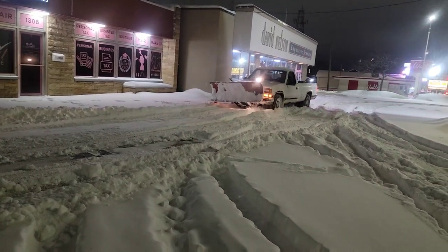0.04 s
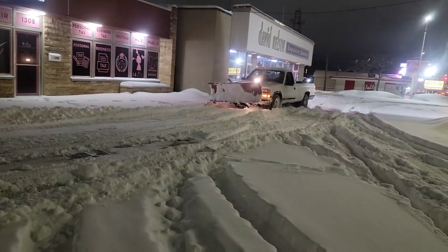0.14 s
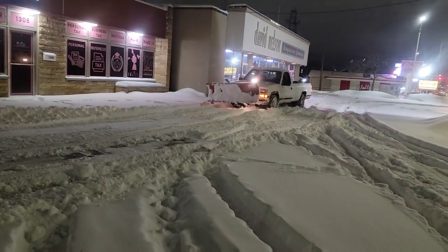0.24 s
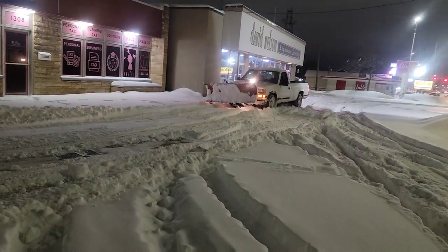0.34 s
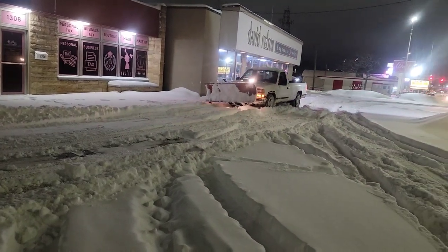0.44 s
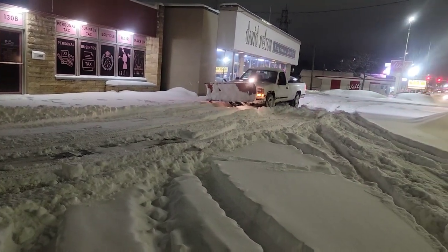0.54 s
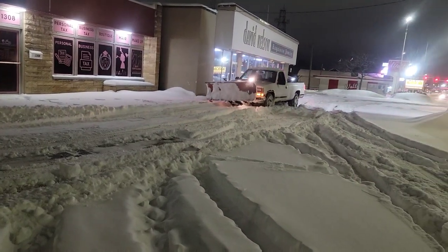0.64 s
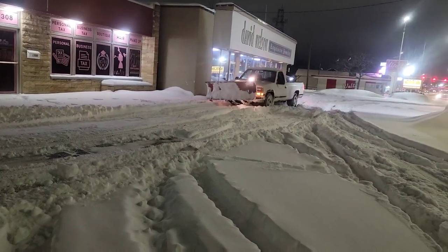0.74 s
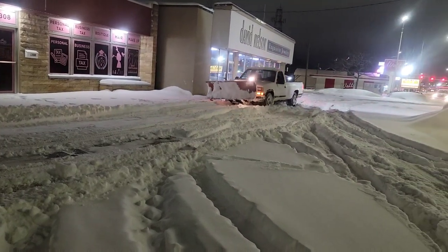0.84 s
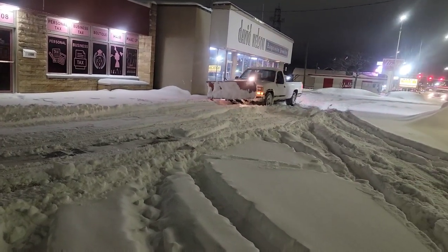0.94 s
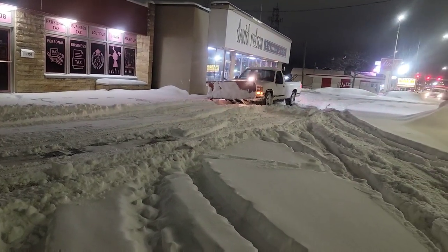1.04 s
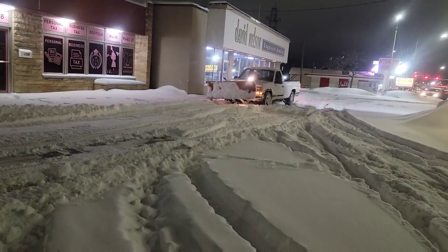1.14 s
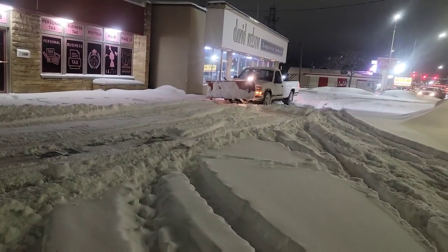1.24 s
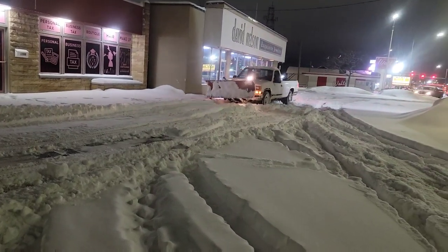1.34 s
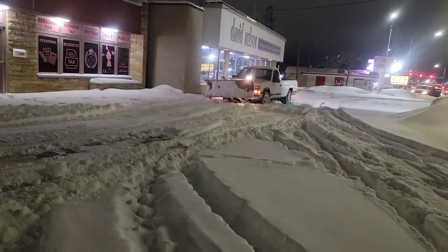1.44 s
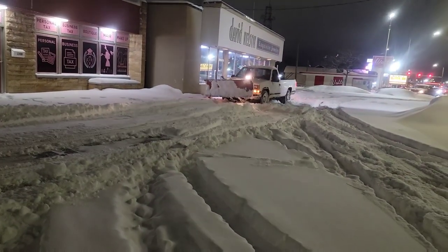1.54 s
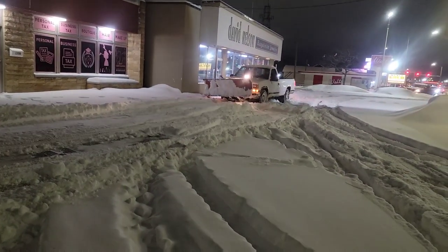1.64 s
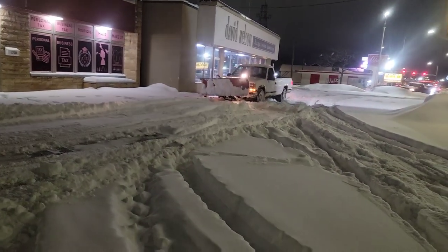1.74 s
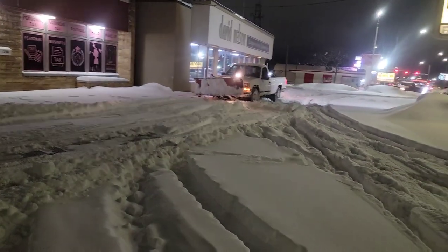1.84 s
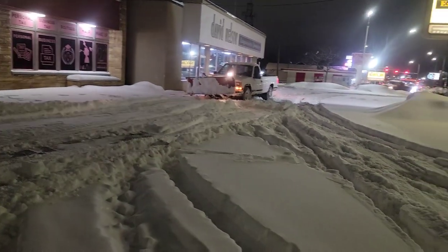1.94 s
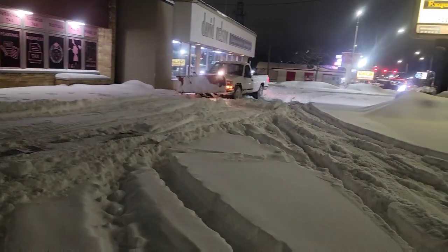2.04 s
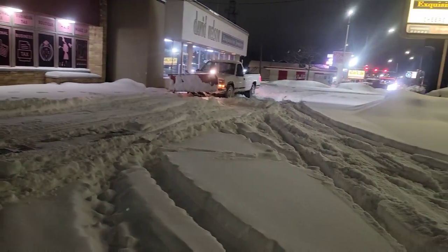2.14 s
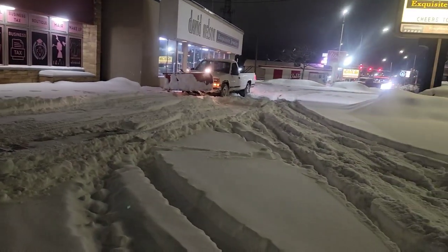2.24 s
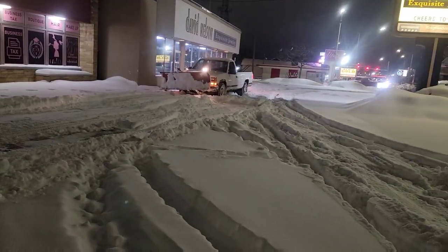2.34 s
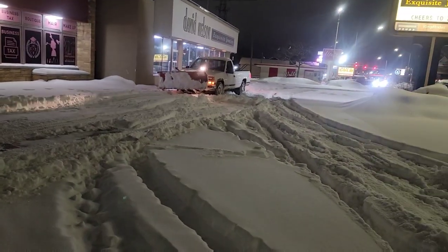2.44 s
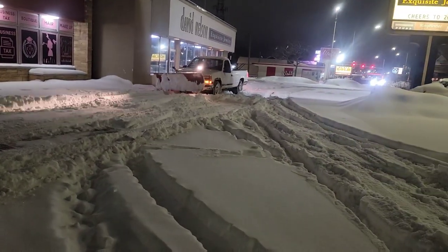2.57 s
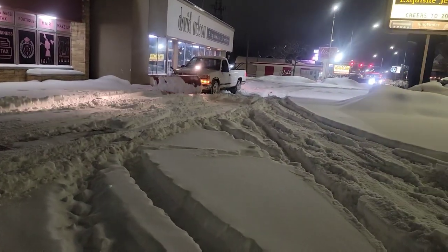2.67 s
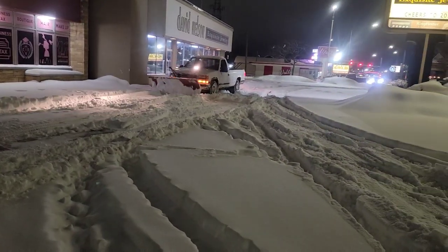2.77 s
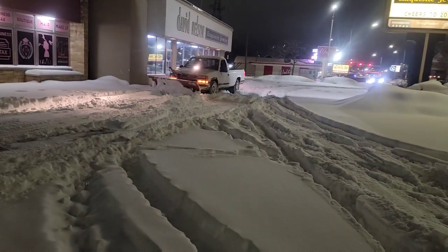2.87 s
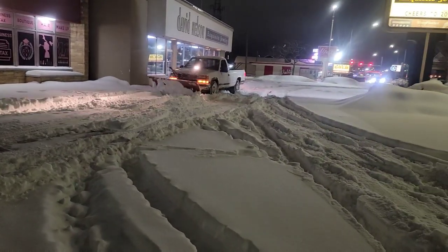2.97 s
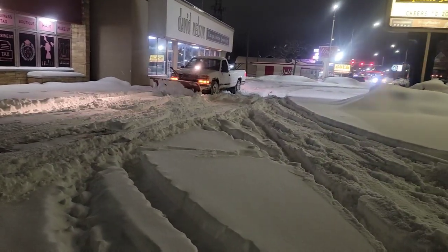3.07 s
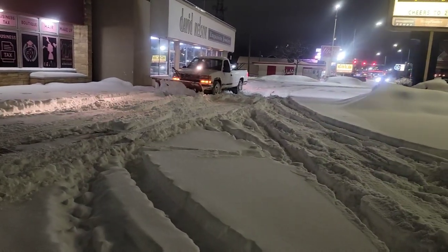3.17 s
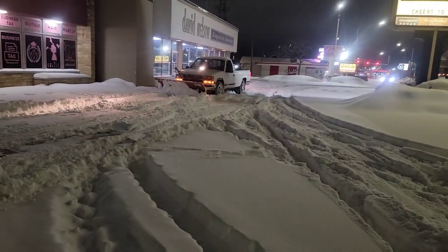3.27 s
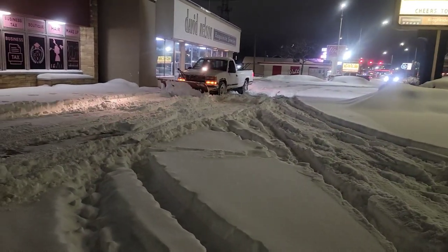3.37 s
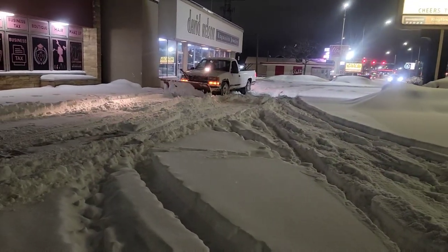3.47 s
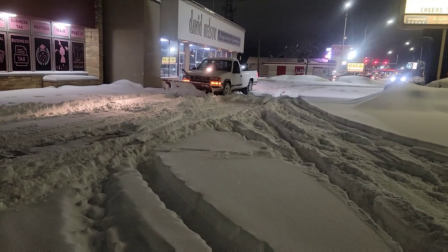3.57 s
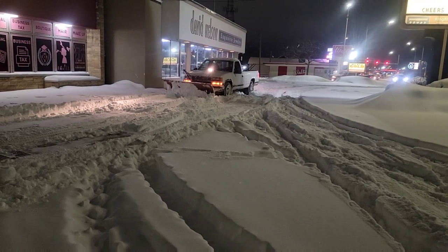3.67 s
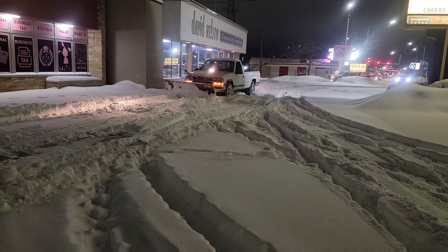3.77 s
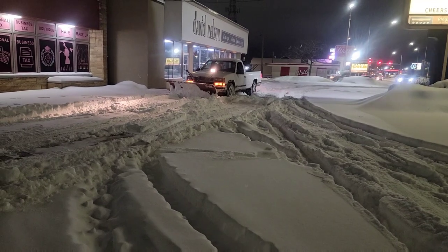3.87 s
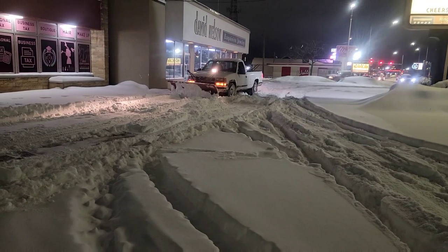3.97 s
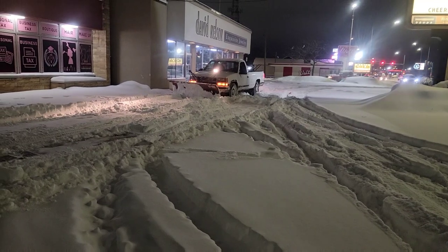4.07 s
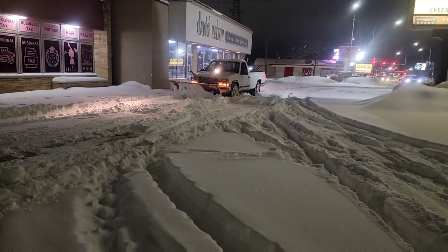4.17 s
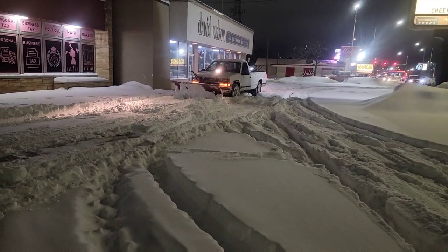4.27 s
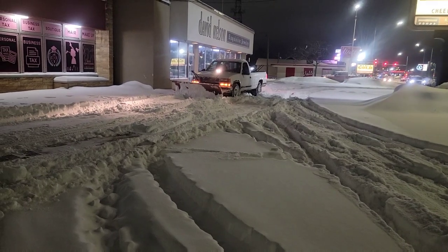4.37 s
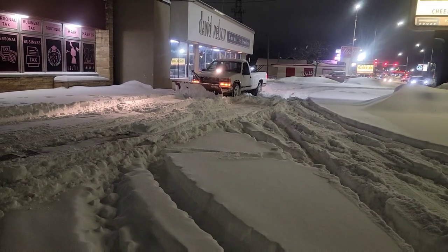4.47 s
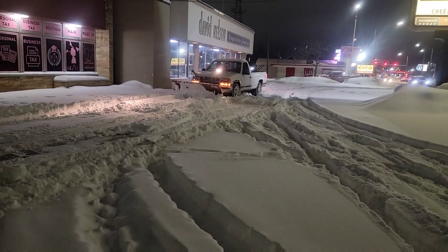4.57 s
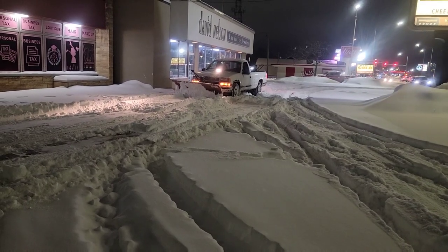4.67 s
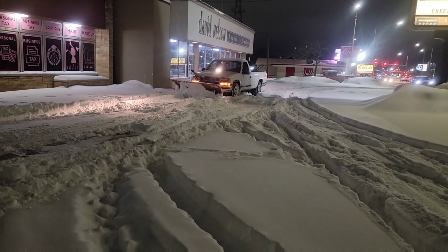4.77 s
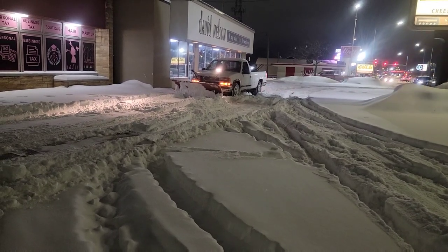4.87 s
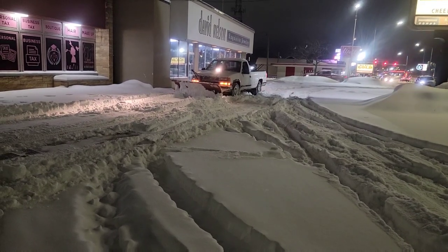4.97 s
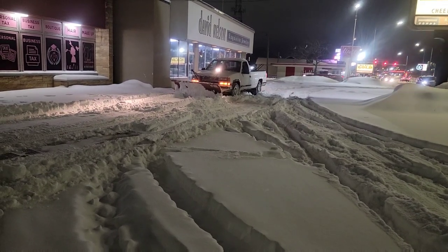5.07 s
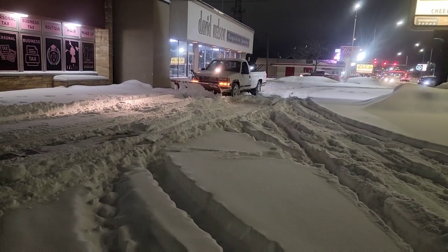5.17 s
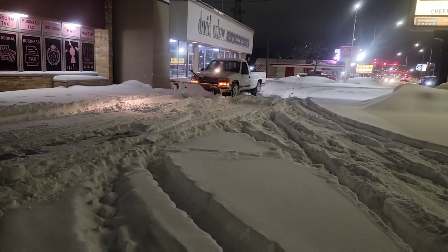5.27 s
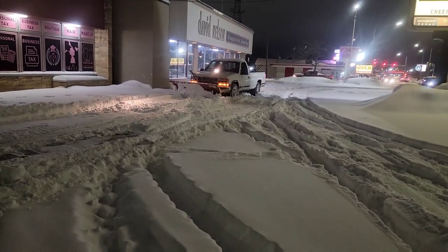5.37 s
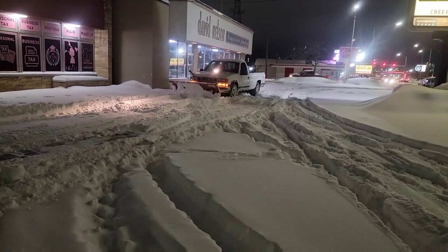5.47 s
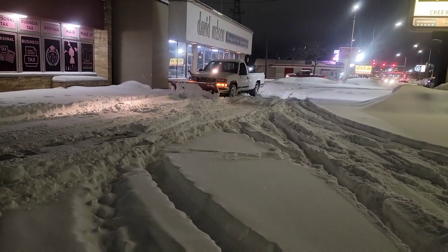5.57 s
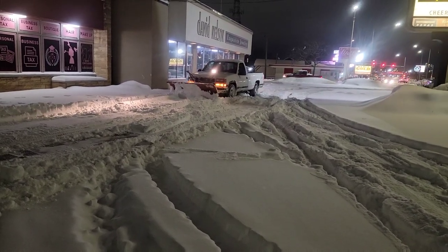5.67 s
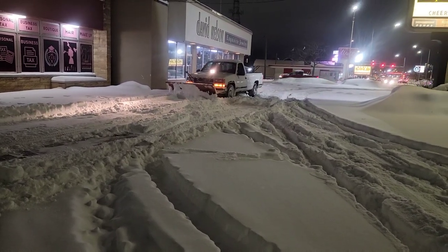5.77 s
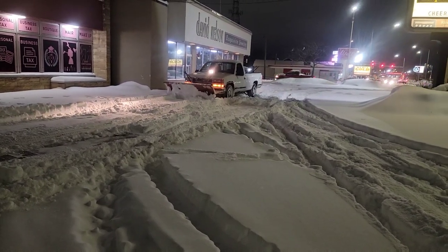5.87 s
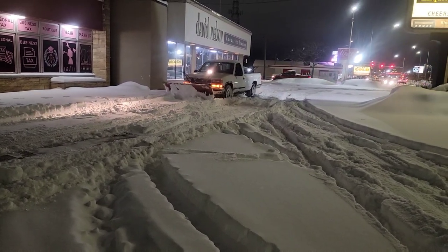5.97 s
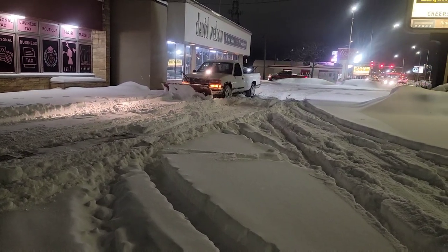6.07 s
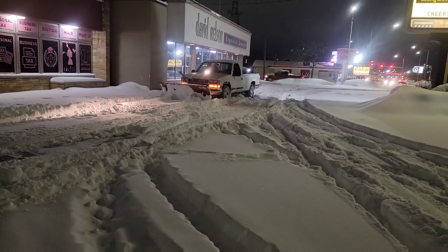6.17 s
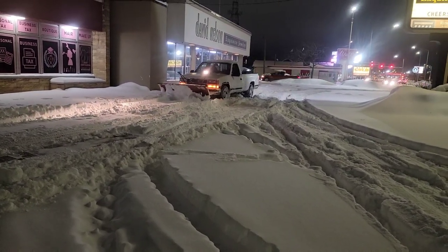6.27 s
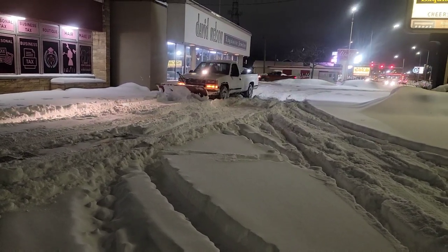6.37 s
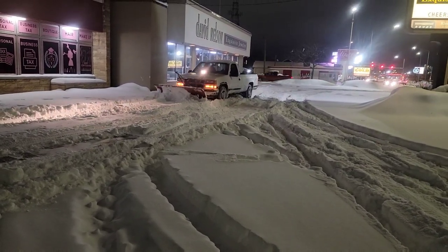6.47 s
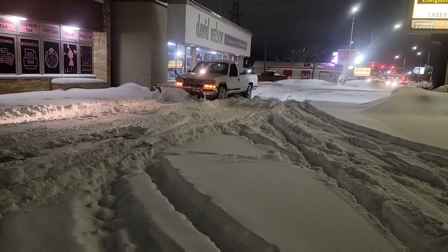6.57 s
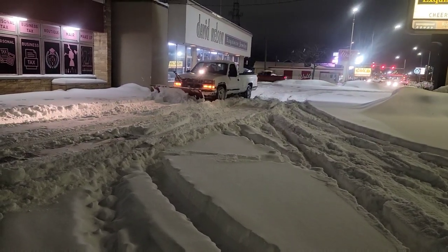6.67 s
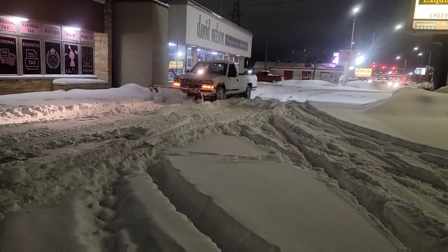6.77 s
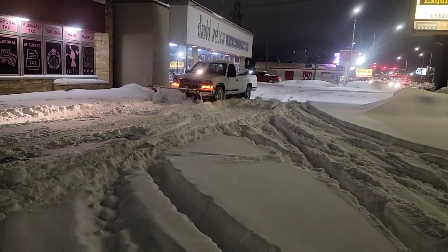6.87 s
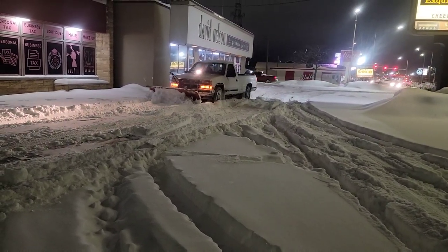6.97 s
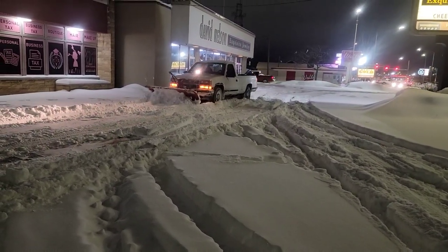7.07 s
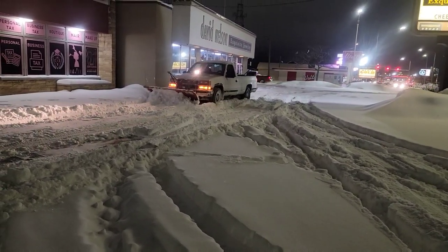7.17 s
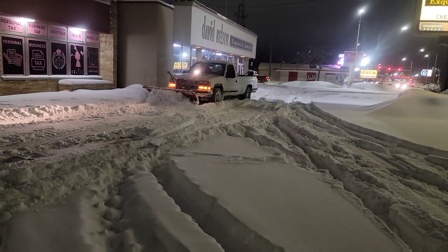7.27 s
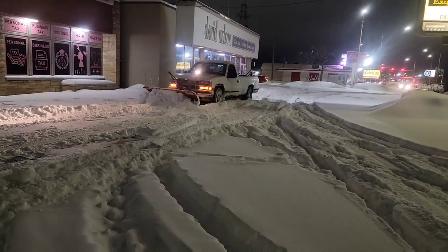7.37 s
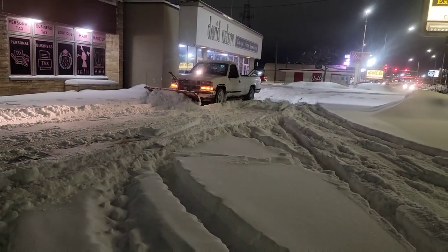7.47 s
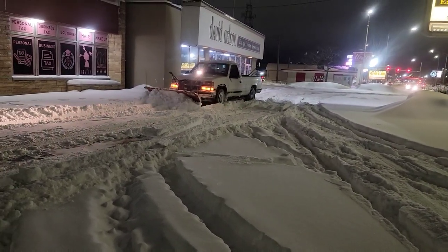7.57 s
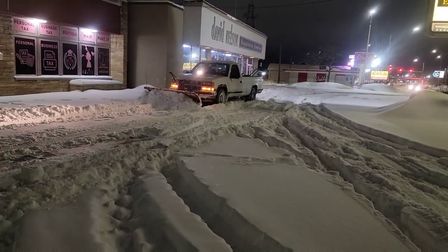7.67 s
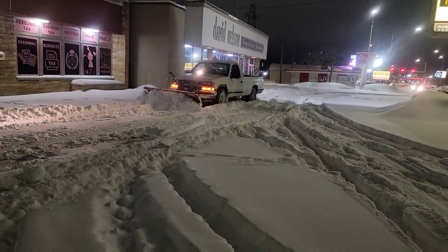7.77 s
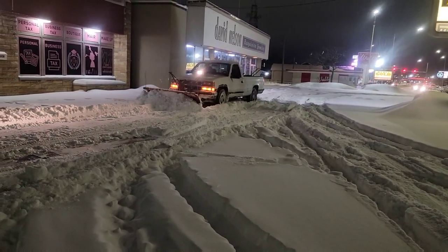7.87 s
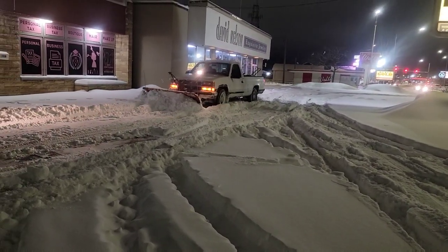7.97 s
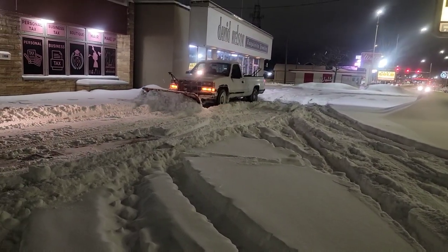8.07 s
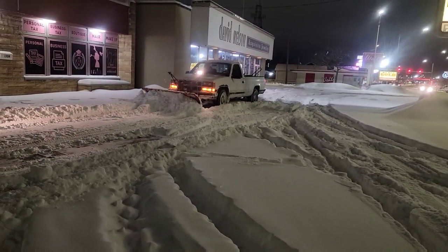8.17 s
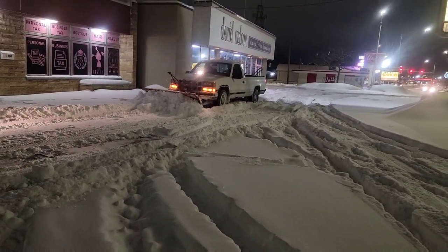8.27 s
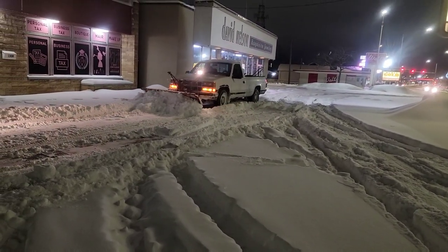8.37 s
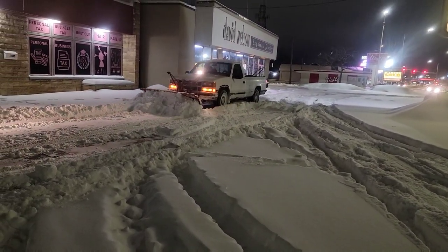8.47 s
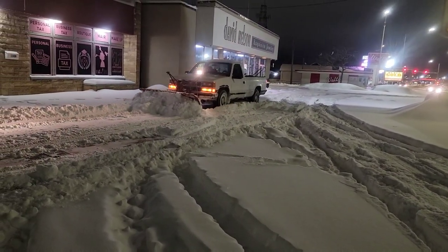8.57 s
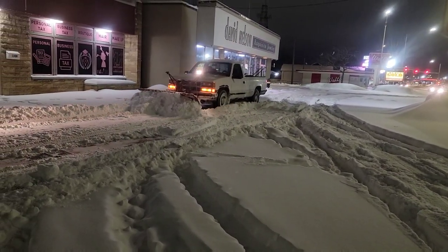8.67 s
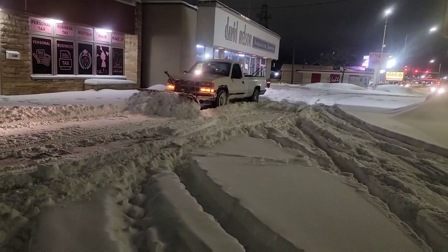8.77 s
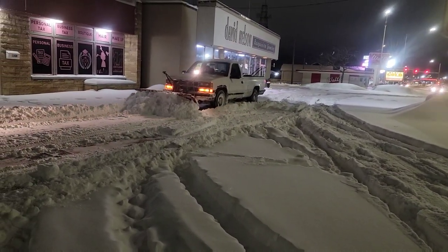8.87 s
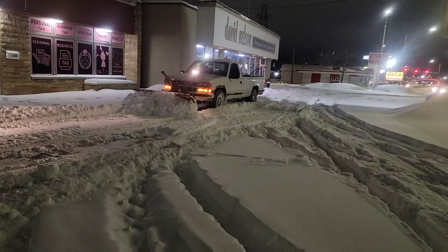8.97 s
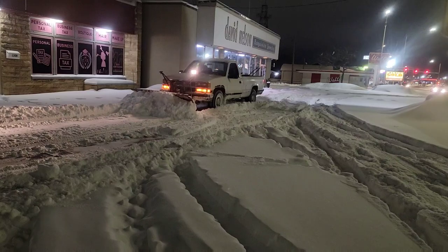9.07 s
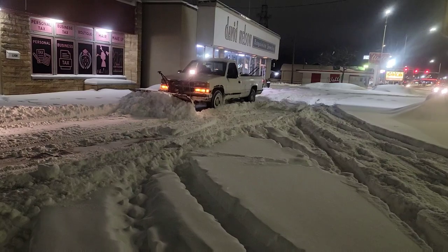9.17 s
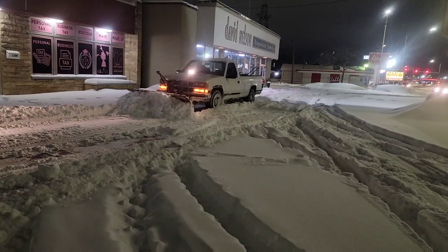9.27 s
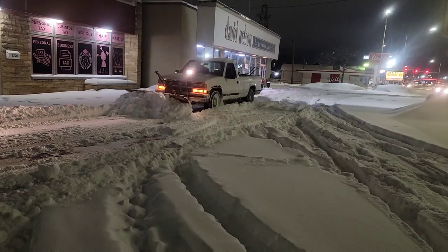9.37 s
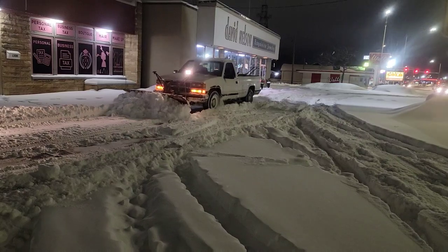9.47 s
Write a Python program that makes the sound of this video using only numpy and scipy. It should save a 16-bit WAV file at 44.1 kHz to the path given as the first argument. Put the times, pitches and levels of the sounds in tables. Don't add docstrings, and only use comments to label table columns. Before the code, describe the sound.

A large pickup gives a short rev, settles to a low lumpy idle, then climbs into loud booming revs as its plough crunches through snow. Cars hiss by on a slushy road, strongest midway. Hollow scrapes of steel and tyres come and go. Outdoors at night, hand-held stereo phone at a distance, faint town traffic behind.

```python
import sys
import numpy as np
from scipy import signal
from scipy.fft import rfft, irfft, next_fast_len
from scipy.io import wavfile
from scipy.ndimage import uniform_filter1d

SR = 44100
rng = np.random.default_rng(int(sys.argv[2]) if len(sys.argv) > 2 else 0)


def inscribe(sig):
    pcm = np.round(np.clip(np.atleast_2d(sig).T, -1, 1) * 32767)
    wavfile.write(sys.argv[1], SR, pcm.astype(np.int16))


def linear_from_db(decibels):
    return 10 ** (np.asarray(decibels, float) / 20)


N = 420273
T = np.arange(N) / SR
FRAME_T = np.arange(N // 256 + 5) * 256 / SR
BIN_HZ = np.fft.rfftfreq(1024, 1 / SR)[:, None]

# start in seconds, length in seconds,
# sag of the engine speed in Hz, cut of the exhaust in dB.
THROTTLE_LIFTS = [
    (5.72, 0.202, 0.393, 0),
    (7.641, .175, 3.1, -12.5),
    (8.435, .22, 3.2, -9),
    (8.984, 0.18, 0.452, 0),
]


def evened(x):
    return x / np.sqrt(np.mean(x ** 2) + 1e-20)


def read(points, hz):
    f, value = np.transpose(points)
    return np.interp(np.log(hz + 1), np.log(f + 1), value)


def curves(rows, t):
    s, *columns = np.transpose(rows)
    return [np.interp(t, s, c) for c in columns]


def drift(size):
    return evened(uniform_filter1d(uniform_filter1d(rng.standard_normal(N), size), size))


def noise(shape_db, level_db, same, lag, balance_db, patchy_db, flicker_db):
    a, b, c, d, patches = rng.standard_normal((len(FRAME_T), 513, 5), dtype=np.float32).T
    patches = evened(uniform_filter1d(uniform_filter1d(patches, 14, 0), 16, 1))
    flicker = evened(uniform_filter1d(rng.standard_normal(len(FRAME_T)), 8))
    same = np.clip(same, -1, 1)
    right = a + 1j * b
    delayed = right * np.exp(-2j * np.pi * BIN_HZ * lag / SR)
    left = same * delayed + np.sqrt(1 - same ** 2) * (c + 1j * d)
    shape = linear_from_db(shape_db) / np.sqrt(np.mean(linear_from_db(shape_db)[:, :1] ** 2))
    size = shape * linear_from_db(level_db + patchy_db * patches + flicker_db * flicker)
    z = np.array([left * linear_from_db(balance_db / 2), right / linear_from_db(balance_db / 2)]) * size
    return signal.istft(z / 20, nperseg=1024, noverlap=768)[1][:, :N]


def town():
    # frequency in Hz, level in dB.
    murmur = [(88, -46), (150, 1.5), (592, 2), (777, 3.5), (3510, -13), (4690, -14.5), (6780, -15),
              (8220, -44), (15300, -60)]
    # frequency in Hz, left-right likeness.
    murmur_same = [(150, 0.83), (300, 0.48), (600, 0), (1500, -1.05), (6000, -0.28)]
    return noise(read(murmur, BIN_HZ), -40, read(murmur_same, BIN_HZ), lag=1.0, balance_db=-3.2,
                 patchy_db=1.0, flicker_db=0.59)


def speed(t):
    # time in seconds, cycles a second in Hz.
    held_speed = [(0, 7.0), (.26, 11.0), (.42, 11.0), (.63, 8.6), (.85, 7.6), (1.2, 6.85), (1.8, 4.95),
                  (4.88, 4.72), (5.17, 5.6), (5.44, 7.4), (5.7, 7.9), (6.92, 8.5), (7.3, 16.7), (7.58, 19),
                  (8.05, 19.4), (8.42, 22), (8.9, 21), (9.53, 20.6)]
    sag = sum(sag_hz * np.maximum(1 - abs((t - s) / length - 1), 0) for s, length, sag_hz, _ in THROTTLE_LIFTS)
    return curves(held_speed, t)[0] - sag


def engine_load(hz):
    return np.clip((hz - 6) / 12, 0, 1)


def passing(cars, gap_db):
    powers = np.array([linear_from_db(2 * db) / (1 + abs((FRAME_T - s) / half) ** 5.07) for s, half, db, *_ in cars])
    return powers, 10 * np.log10(powers.sum(0) + linear_from_db(2 * gap_db))


def road():
    # time when level in seconds, half length in seconds, hiss in dB, spray brightness in dB.
    close_cars = [
        (0.52, 0.46, -32.5, -2),
        (5.055, 0.31, -27, 1.5),
        (5.505, 0.12, -24.5, 1.5),
        (6.2, 0.48, -30.5, 0),
        (7.18, 0.28, -34.5, -0.5),
        (8.1, 0.3, -36, 1.5),
        (8.8, 0.089, -36, -4),
        (9.45, 0.19, -34.5, -1.5),
    ]
    # time when level in seconds, half length in seconds, hiss in dB.
    far_cars = [
        (.95, .2, -39),
        (1.5, 0.48, -40.5),
        (2.3, 0.34, -38.5),
        (3.4, 0.44, -37),
        (4.4, .4, -35.5),
        (5.6, .1, -46),
        (6.65, 0.18, -39.5),
        (8.55, .4, -37.5),
    ]
    # frequency in Hz, level in dB.
    hiss, rumble = [(100, -16), (300, -5), (600, -1), (1200, 5.5), (2200, -1.5), (3500, -6), (5000, -16.5),
                    (7200, -17.5), (8200, -26.5), (11000, -29), (12700, -30.5), (15500, -33)], [(15, -44), (25, -8), (48, -3), (69, 29), (99, -18), (156, -24.5),
                                  (400, -20.5), (520, -59), (880, -120)]
    # frequency in Hz, left-right likeness.
    close_same, far_same = [(200, 0.73), (1000, 1), (3000, 0.75), (6000, 0.58), (12000, 0.41)], [(200, 0.98), (1000, 0.82), (3500, 0.52), (7000, 0.7),
                                               (12000, 0.16)]
    # frequency in Hz, left minus right in dB.
    hiss_balance = [(200, -10.5), (1000, -2.5), (3500, -3), (4500, 2), (8000, 3), (14000, 6)]
    # time in seconds, samples the left hears late.
    close_lag, far_lag = [(0, 16), (.8, 20), (1.2, 20), (4.5, 20.5), (5.2, 19), (6, 19), (6.5, 17),
                          (7.5, 14), (8.5, 17.5), (9.53, 17)], [(0, 16), (.8, 20), (1.12, 20), (1.25, 17), (1.5, 15),
                                             (2.1, 12), (2.3, 7.3), (3, 7.3), (3.7, 10), (4.2, 13),
                                             (5.1, 19), (6, 20), (6.5, 17), (7.5, 14), (8.5, 17.5),
                                             (9.53, 17)]
    powers, close_db = passing(close_cars, gap_db=-44)
    far_db = passing(far_cars, gap_db=-46.5)[1]
    spray_db = np.array(close_cars)[:, 3] @ powers / powers.sum(0)
    slope = np.clip(np.log2((BIN_HZ + 1) / 1500) / 2, -1, 1)
    splashes = evened(uniform_filter1d(rng.standard_normal(len(FRAME_T)), size=9))
    splash_db = 1.6 * splashes * np.maximum(slope, 0) ** 2
    shape_db, balance_db = read(hiss, BIN_HZ), read(hiss_balance, BIN_HZ)
    close = noise(shape_db, close_db + np.clip(spray_db, -8, 5) * slope, read(close_same, BIN_HZ),
                  curves(close_lag, FRAME_T)[0], balance_db, patchy_db=1.13, flicker_db=0.72)
    far = noise(shape_db + 4.8 * slope, far_db + splash_db, read(far_same, BIN_HZ),
                curves(far_lag, FRAME_T)[0], balance_db, patchy_db=0.59, flicker_db=0.36)
    rumble_db = -42 + 10.5 * engine_load(speed(FRAME_T))
    low = noise(read(rumble, BIN_HZ), rumble_db, same=0.84, lag=0, balance_db=-0.45,
                patchy_db=1.0, flicker_db=0.38)
    return close + far + low


def hum():
    # time in seconds, pitch in Hz, level in dB.
    glide = [(3.4, 110.5, -60), (4.2, 112.8, -51), (5, 115.5, -50), (5.5, 116.3, -48), (5.75, 116.6, -40),
             (6.4, 115.4, -42), (6.8, 113.5, -48), (7.1, 112, -60)]
    parts_db = [1, 1, -8]
    hz, level_db = curves(glide, T)
    turns = 2 * np.pi * np.cumsum(hz) / SR
    parts = sum(linear_from_db(db + 1.1 * drift(size=4000)) * np.cos((k + 1) * turns) for k, db in enumerate(parts_db))
    return np.sqrt(2) * linear_from_db(level_db) * parts * (T > glide[0][0]) * (T < glide[-1][0])


def scrapes():
    # time in seconds, resonance in Hz, level in dB.
    scrape_paths = [
        [(1.6, 712, -50), (1.75, 746, -44.5), (1.95, 925, -41.5), (2.15, 960, -44), (2.35, 1040, -44),
         (2.45, 1720, -45), (2.6, 2620, -40), (2.7, 2900, -51)],
        [(3.3, 780, -49), (3.7, 840, -44.5), (4.4, 674, -41), (5, 740, -50), (5.3, 720, -70)],
        [(6.4, 720, -50), (6.7, 660, -43.5), (7.3, 618, -41.5), (7.8, 680, -43.5), (8.7, 690, -44),
         (9, 690.6, -54)],
        [(7.8, 1150, -64), (7.9, 1190, -39), (8.2, 1200, -41), (8.35, 1200, -55)],
    ]
    octaves = .33
    power = 1e-14
    for rows in scrape_paths:
        hz, level_db = curves(rows, FRAME_T)
        bump = np.exp(-(np.log2((BIN_HZ + 1) / hz) / octaves) ** 2)
        bump = bump * (FRAME_T > rows[0][0]) * (FRAME_T < rows[-1][0])
        power = power + bump / (hz * octaves / (SR / 2)) * linear_from_db(2 * level_db)
    return noise(0 * BIN_HZ, 10 * np.log10(power), same=0.27, lag=-6.0, balance_db=-5.0,
                 patchy_db=2.26, flicker_db=0.6)


def plough():
    # time in seconds, level in dB.
    push = [(0, -42), (2, -49.5), (6, -59), (7, -38.5), (7.3, -37), (7.6, -36.5), (7.85, -38), (8.1, -34),
            (8.3, -31), (8.5, -37.5), (8.75, -33), (9, -34), (9.25, -34), (9.53, -32.5)]
    # frequency in Hz, level in dB.
    crunch = [(120, -22), (250, 13.5), (450, -1.5), (750, -3), (1200, -0.5), (2000, -6.5), (2700, -2.5),
              (4000, -44), (7000, -62), (9000, -28), (12700, -22), (15500, -42)]
    return noise(read(crunch, BIN_HZ), curves(push, FRAME_T)[0], same=.95, lag=-6.0, balance_db=0,
                 patchy_db=1.0, flicker_db=.6)


def cab_boom(t):
    # start in seconds, length in seconds, level in dB.
    booms = [
        (7.23, .28, -26.5),
        (7.67, 0.12, -13),
        (7.915, 0.477, -13),
        (8.537, 0.051, -11.5),
        (8.724, 0.23, -18),
        (9.03, .16, -36),
        (9.24, .4, -18),
    ]
    fade_db_per_s, quiet_db = 218, -74
    away_s = [np.maximum(np.maximum(s - t, t - s - length), 0) for s, length, _ in booms]
    return np.max([np.maximum(row[2] - fade_db_per_s * away, quiet_db) for row, away in zip(booms, away_s)], axis=0)


def exhaust_levels(t, hz, load):
    # time in seconds, effort in dB.
    effort = [(0, -27), (.1, -12), (.2, -27), (.3, -16), (.47, -25), (1.2, -30), (1.6, -40.5), (5.3, -35.5),
              (5.45, -21), (5.7, -18.5), (5.95, -23), (6.8, -21.5), (7.15, -14), (7.4, -17.5), (7.95, -15),
              (8.72, -14.5), (9.1, -17), (9.53, -14)]
    # frequency in Hz, level in dB.
    silencer, tailpipe = [(30, -62), (38, -40), (43, -1), (52, 6), (64, 8), (82, 0), (100, 2.5),
                          (145, -16.5), (175, -11.5)], [(45, -8), (55, 0), (65, -4), (80, -8), (103, -8), (120, -10),
                                            (143, -8), (175, -12), (230, -12), (350, -21), (750, -26)]
    # dB of multiples 9-16, repeating every 8 as one cycle fires 8 times.
    banks_idle_db, banks_loaded_db = np.array([-14, -9, -9, -8, 0, -6, -6, 0]), np.array([-6, 2, 0, -2, 0, -5, -4, -9])
    # cycles a second in Hz, width in Hz, lift of upper tones in dB.
    rocks = [
        (5.6, 0.41, 7),
        (10.8, 2.1, 5.5),
    ]
    cut_db = sum(db * np.sin(np.pi * np.clip((t - s) / length, 0, 1) ** 0.56) ** 2
                 for s, length, _, db in THROTTLE_LIFTS)
    effort_db = curves(effort, t)[0] + cut_db
    nearing_db = 4.5 * np.maximum(t - 7.52, 0)
    third = cab_boom(t)
    fifth = effort_db - 1 - 2 * np.clip((10 - hz) / 2, 0, 1) + read(silencer, 5 * hz)
    fourth = fifth - 38 + 17 * load + .85 * nearing_db
    eighth = effort_db + 0.24 * cut_db + 0.3 * nearing_db + read(silencer, 8 * hz)
    upper = -36.5 + nearing_db + sum(db * np.exp(-((hz - at_hz) / width_hz) ** 2) for at_hz, width_hz, db in rocks)
    level_db = {2: third - 17, 3: third, 4: fourth, 5: fifth, 6: fifth - 21 + 14 * load,
                7: eighth - 21, 8: eighth}
    for k in range(9, 37):
        banks_db = (1 - load) * banks_idle_db[(k - 1) % 8] + load * banks_loaded_db[(k - 1) % 8]
        banks_db -= .85 * max(k - 16, 0) * (1 - load)
        level_db[k] = upper + 8.5 * load + banks_db * (k != 11) + read(tailpipe, k * hz)
    return level_db


def exhaust():
    t = T[::16]
    hz = speed(t)
    load = engine_load(hz)
    turns = np.cumsum(uniform_filter1d(hz, size=150)) * 16 / SR + .8
    flutter = drift(size=3000)[::16]
    sway = evened(uniform_filter1d(uniform_filter1d(flutter, size=900), size=900))
    scatter = 1 - .45 * load
    out = 0
    for k, db in exhaust_levels(t, hz, load).items():
        waver_db = .8 * np.roll(flutter, 900 * k) * (k > 8)
        share = 1 if k in {2, 3, 4, 7, 8} else .25
        echo_turns = .26 * share * load * np.roll(sway, 1700 * k)
        loose_turns = scatter * rng.uniform(-0.55, 0.45)
        out = out + linear_from_db(db + waver_db) * np.cos(2 * np.pi * (k * turns + 9 / k + echo_turns + loose_turns))
    return np.sqrt(2) * signal.resample_poly(out, 16, 1)[:N]


def scene():
    bass = exhaust() + hum()
    pair = np.array([bass * linear_from_db(-5.0), np.roll(bass, -12) * linear_from_db(-0.23)])
    return pair + road() + town() + plough() + scrapes()


def roll_off(x):
    return signal.sosfilt(signal.butter(12, 15420, fs=SR, output="sos"), x)


def record(dry):
    # frequency in Hz, lift in dB, turn in radians.
    widen = np.array([(150, -5, 0.95), (350, 3.5, 0.53), (650, 5.5, 0.34), (1200, 1.5, -0.43),
                      (2520, 1, 0.34), (4020, -0.5, -0.085), (8000, -0.5, 0.22)])
    # frequency in Hz, level in dB.
    right_port = [(2600, 0), (3650, 1.5), (3950, 0), (5200, -0.5)]
    size = next_fast_len(N)
    hz = np.fft.rfftfreq(size, 1 / SR)
    side_turn = linear_from_db(read(widen[:, :2], hz)) * np.exp(1j * read(widen[:, ::2], hz))
    left = rfft(dry[0], size)
    right = rfft(dry[1], size) * linear_from_db(read(right_port, hz))
    mid = irfft((left + right) / 2, size)[:N]
    side = irfft((left - right) / 2 * side_turn, size)[:N]
    return roll_off(np.array([mid + side, mid - side]))


dry = scene()
out = record(dry)
inscribe(out)
```